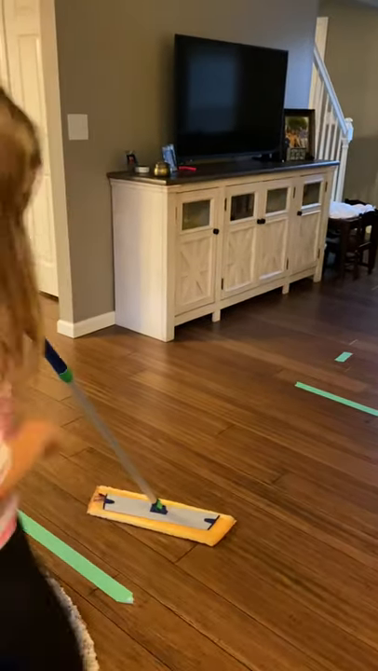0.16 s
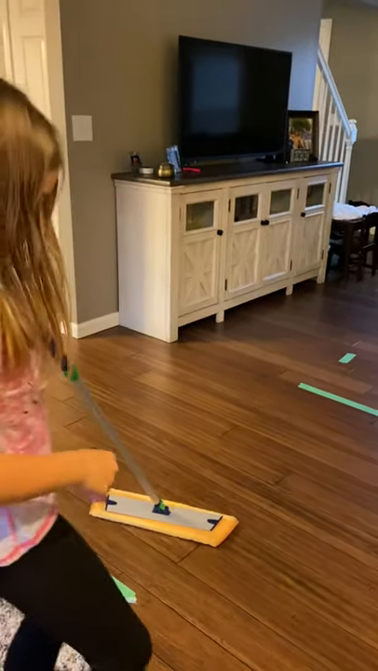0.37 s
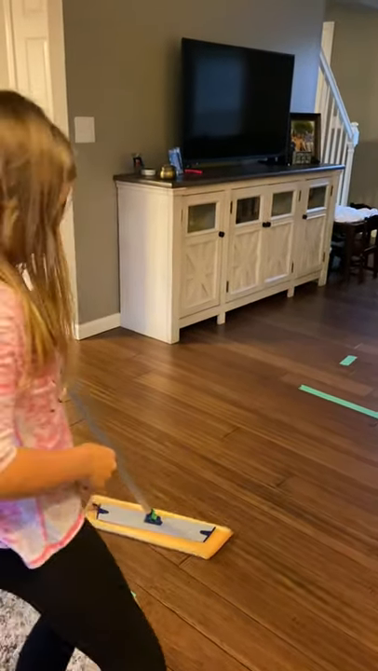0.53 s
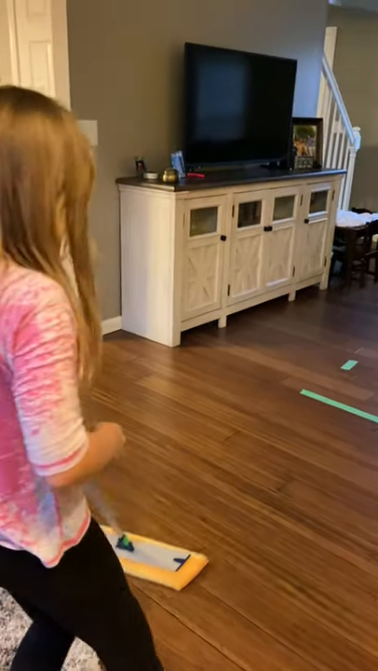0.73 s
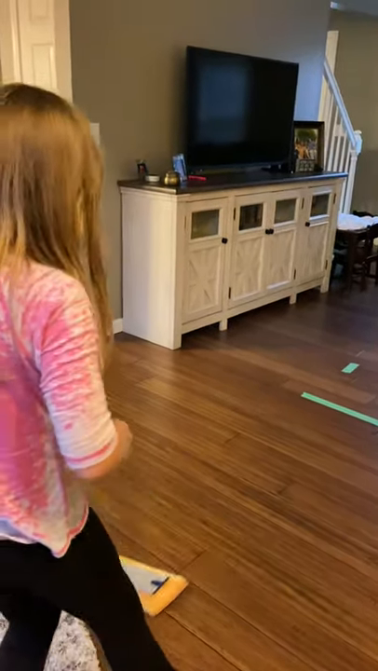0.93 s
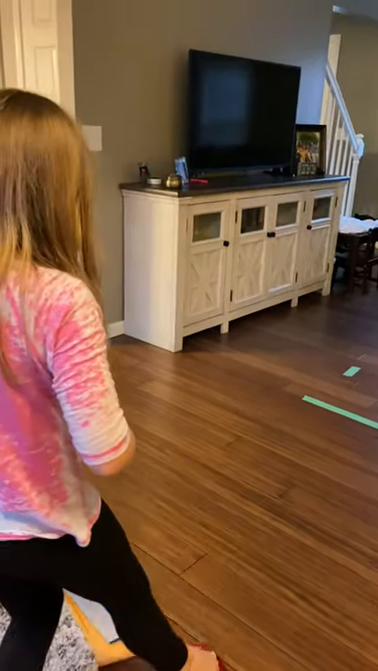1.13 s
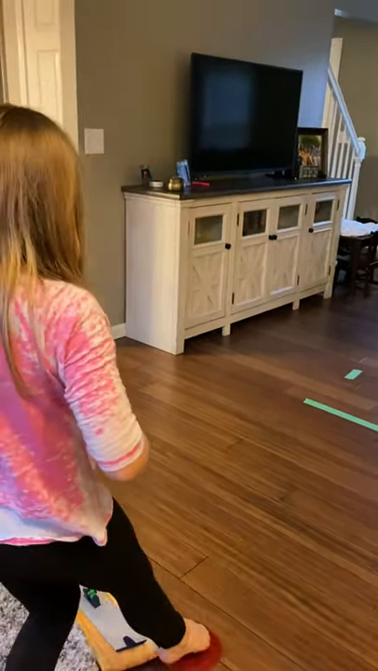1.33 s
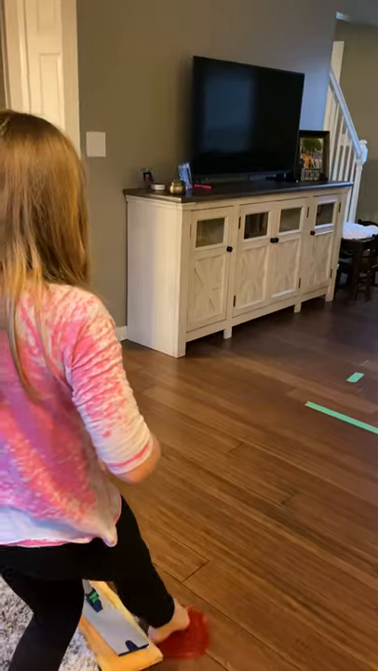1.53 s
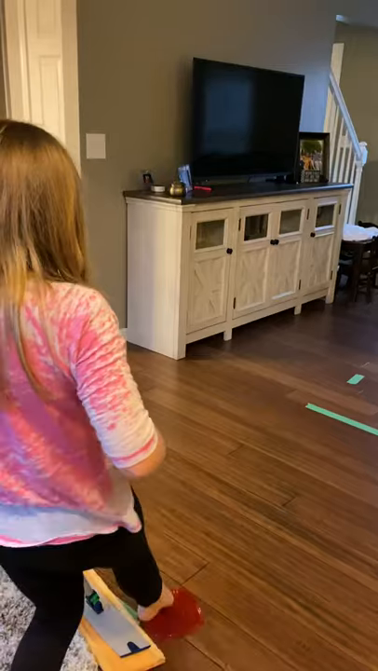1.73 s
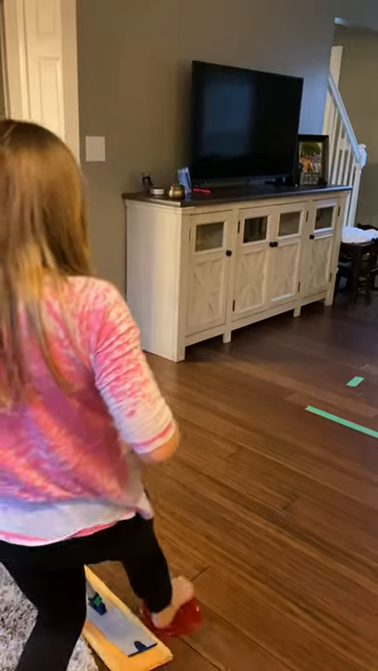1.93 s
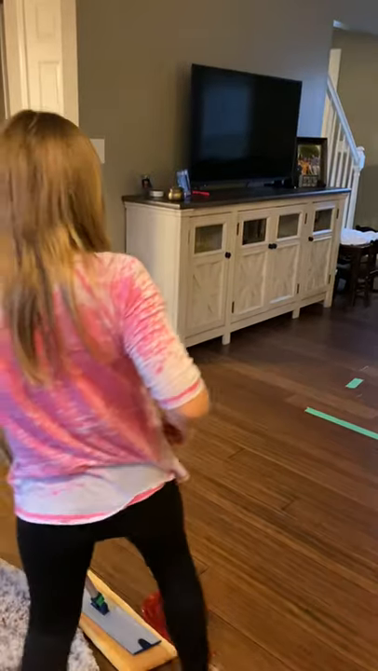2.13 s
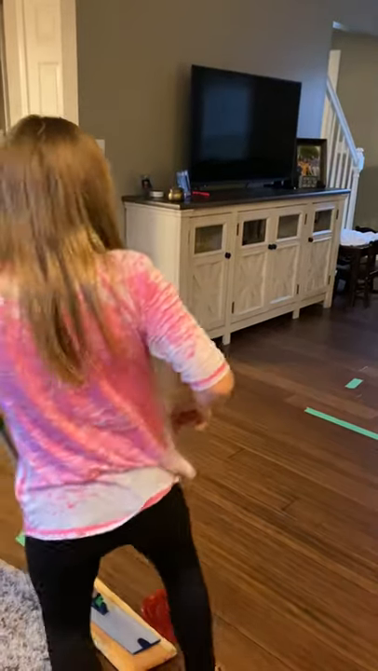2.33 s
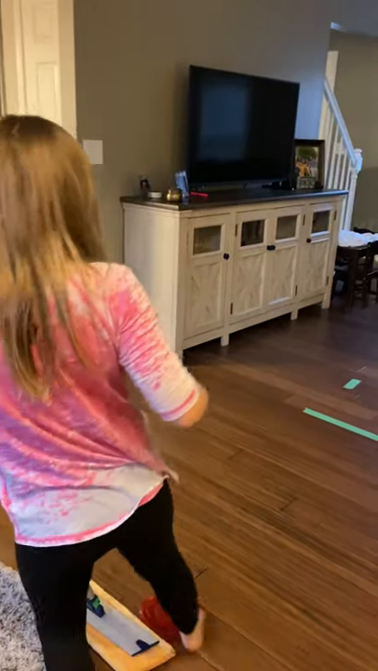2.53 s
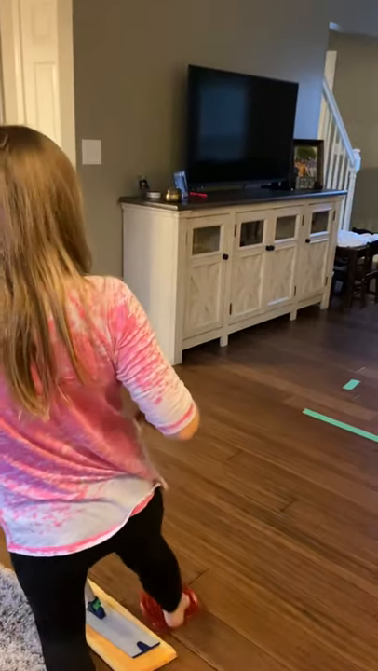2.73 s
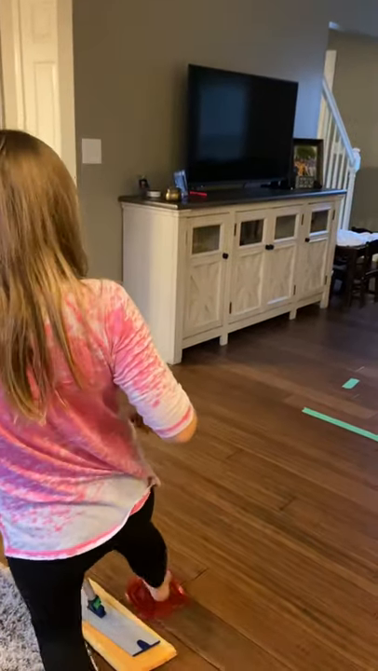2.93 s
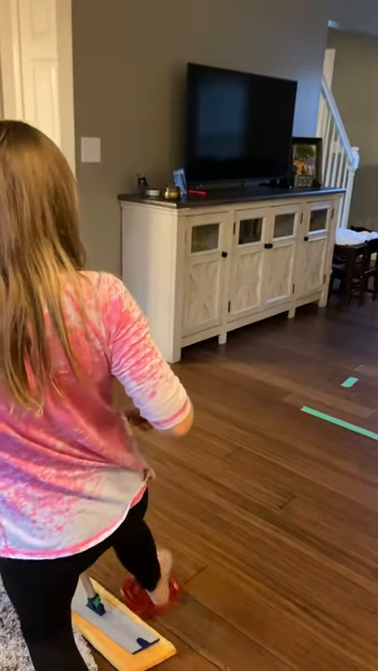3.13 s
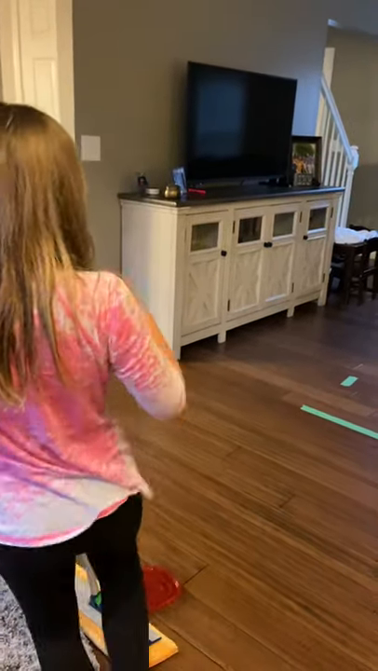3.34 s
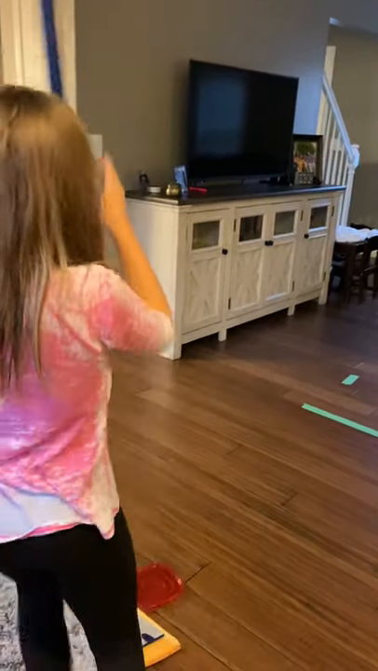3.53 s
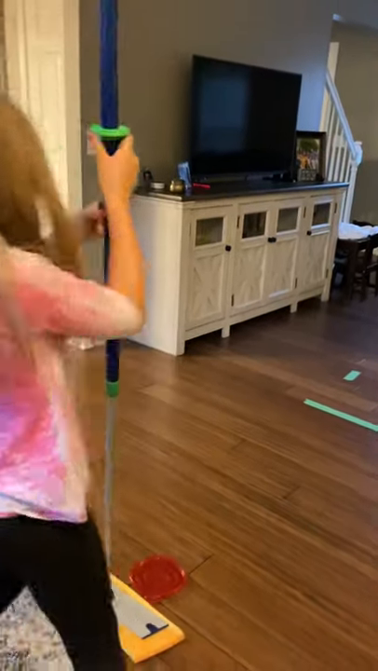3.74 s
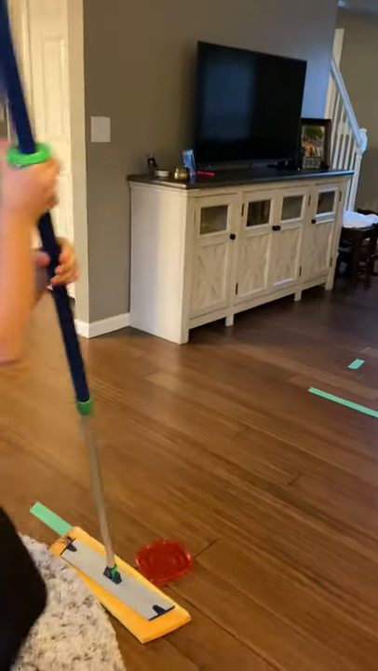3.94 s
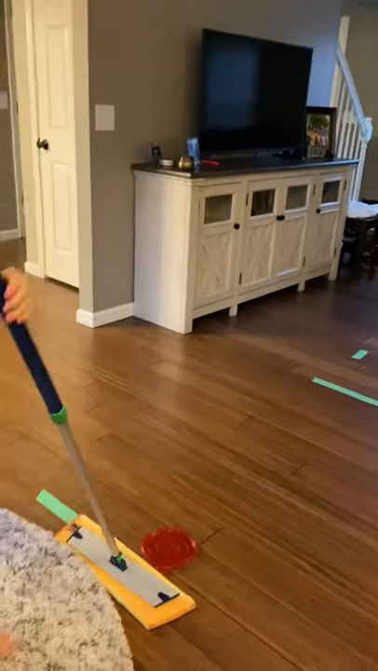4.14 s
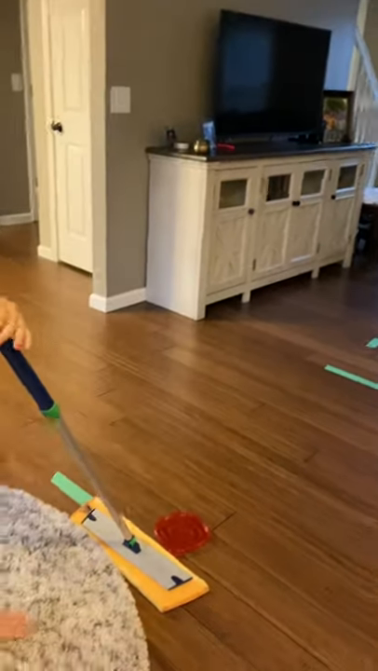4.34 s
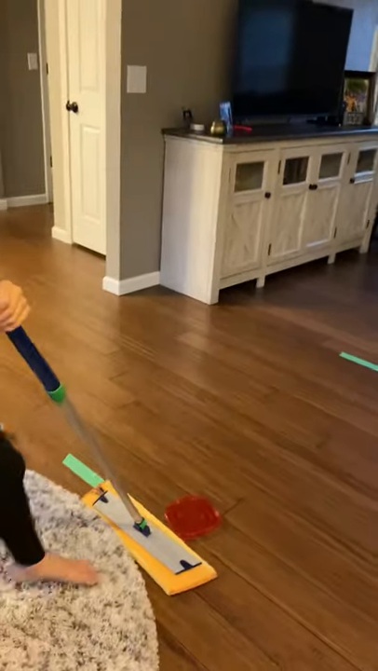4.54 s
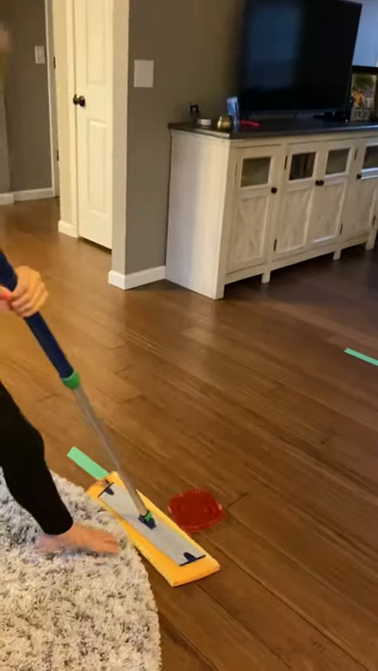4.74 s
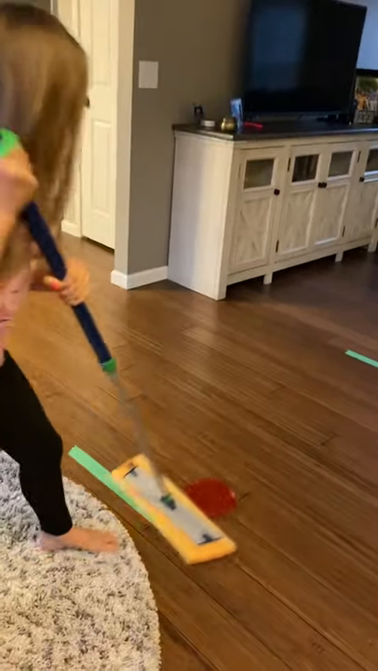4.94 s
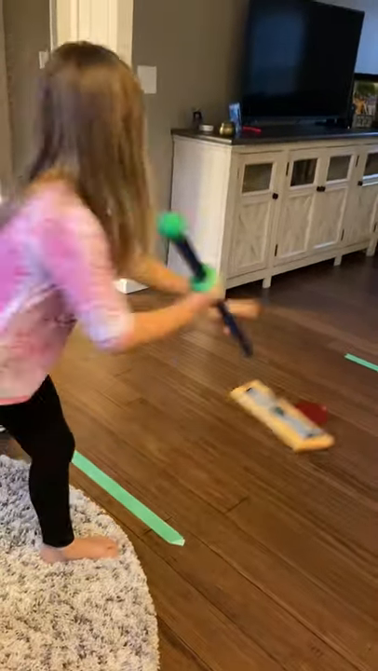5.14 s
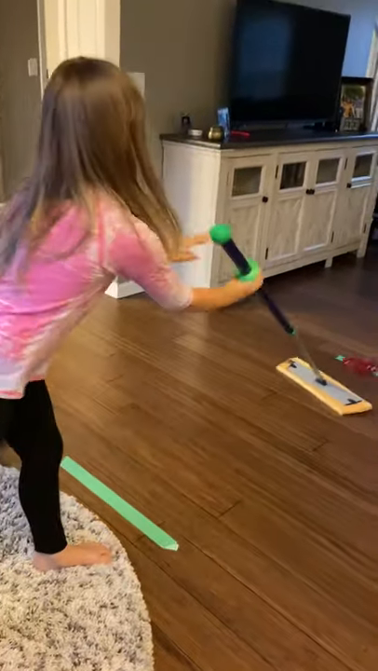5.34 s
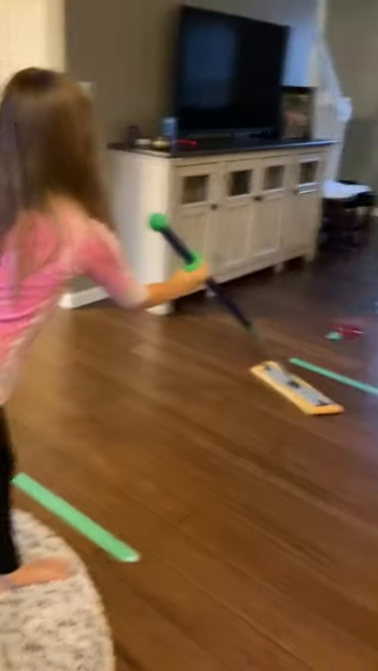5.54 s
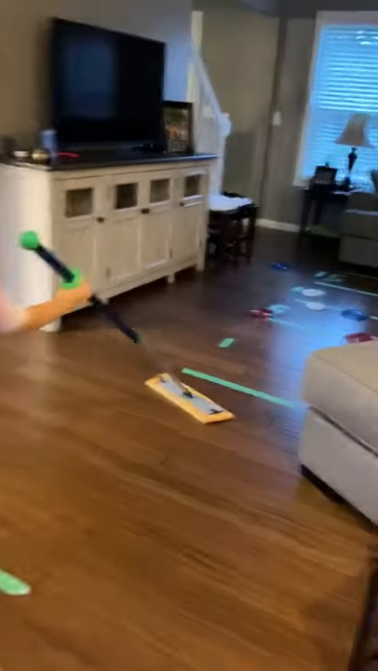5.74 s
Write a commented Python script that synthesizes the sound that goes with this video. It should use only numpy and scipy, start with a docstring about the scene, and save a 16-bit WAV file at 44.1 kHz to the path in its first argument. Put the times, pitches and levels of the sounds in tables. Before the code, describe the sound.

Over a low indoor hum, a mop knocks a plastic lid across floorboards; quiet shuffling and thuds lead to a loud, rattling scrape.

```python
"""A machine's low hum is heard first, with the air of the room and light rubs and taps on a hardwood floor.
A flat mop knocks a plastic lid over the boards; a bare foot nudges it back, and the mop shoves it off.
Stick-slip over grit scrapes and rings the lid, impulses knock it, and noise makes rubs, taps and short rings.
Damped sinusoids with noise make the footfalls, and harmonics of one turning rate make the hum."""
import sys
import numpy as np
from scipy import signal
from scipy.fft import rfft, irfft
from scipy.io import wavfile

SR = 44100
rng = np.random.default_rng(int(sys.argv[2]) if len(sys.argv) > 2 else 0)


def materialize(psi):
    """Save the field psi as 16-bit PCM at rate SR to the path in sys.argv[1].

    A 1-D psi becomes a single channel; in a 2-D psi each row is a channel.
    """
    bounded = np.clip(np.atleast_2d(psi).T, -1, 1)
    quanta = np.round(bounded * 32767).astype(np.int16)
    wavfile.write(sys.argv[1], SR, quanta)


N = 254898

# Harmonics of the machine: multiple of the turning rate, early level/dB, level once it labours/dB
HUM_HARMONICS = [(4, -47, -48), (5, -75, -56), (6, -63.5, -88), (7, -74.5, -63.5), (8, -84, -58.5),
                 (10, -58, -56.5), (11, -68, -56), (12, -61, -66), (18, -80, -72.5)]
TURN_HZ, LABOURS_AT_S = 14.245, 3.5
# Spectrum of the room's air: f/Hz, relative level/dB
AIR_SPECTRUM = [(20, -16), (45, 1.5), (90, 1), (150, 3), (200, -8), (300, -9.5), (450, -22.5), (800, -32.5),
                (2000, -36.5), (5000, -48), (10000, -56), (16000, -53)]
AIR_DB = -53

# Light sweeps of pad and bare soles: t of the fastest moment/s, rise/s, fade/s,
# pad level/dB, scrape level/dB, hiss level/dB (levels before the shared trims)
SWEEPS = [(.04, 0.91, 0.15, -57, -80, -85.5), (.17, 0.13, 0.093, -74, -71, -91),
          (1.87, 0.047, 0.21, -64.5, -120, -81), (2.025, 0.12, 0.12, -58.5, -68, -102),
          (2.19, 0.26, 0.34, -58.5, -67, -77.5), (2.379, 0.17, 0.052, -69, -71, -94),
          (3.3, .02, 0.19, -74, -91, -107), (3.45, 0.092, 0.52, -65, -70.5, -79.5),
          (3.63, 0.12, 0.18, -72, -71, -89), (4.11, 0.068, 0.27, -68.5, -69, -81),
          (4.221, 0.14, 0.2, -73.5, -73.5, -98), (4.81, 0.18, 0.088, -58, -63, -88),
          (4.847, 0.035, 0.059, -54, -47, -67)]
SWEEP_DEPTH_DB, SWEEP_RING_DB = 27.5, -18  # drop over one rise or fade time; rim ring against scrape

# Scuffs, light taps and short noisy rings of the struck lid:
# t/s, level/dB, centre f/Hz, 60 dB decay/s, band edge over centre
NOISE_BURSTS = [(.035, -39, 1050, .04, 1.25), (.037, -43, 600, .05, 2), (.402, -52, 420, .05, 1.6),
                (.731, -23, 1130, .11, 1.1), (.7315, -29, 480, .08, 1.35), (.776, -32, 480, .25, 1.7),
                (1.185, -28.5, 2700, .13, 1.35), (1.185, -26, 1870, .17, 1.06), (1.186, -38, 480, .14, 1.9),
                (1.464, -37, 540, .04, 2), (1.524, -40, 1300, .08, 2), (1.867, -48, 600, .06, 1.7),
                (2.156, -41, 1000, .04, 1.6), (2.162, -38, 590, .06, 1.3), (2.366, -50, 900, .09, 2.2),
                (2.668, -33, 2600, .1, 1.55), (2.692, -30, 2600, .09, 1.55), (2.927, -35, 2200, .1, 1.55),
                (2.935, -46, 560, .4, 1.7), (3.123, -50, 980, .07, 1.3), (3.141, -49, 980, .05, 1.3),
                (3.232, -54, 1300, .06, 1.3), (3.469, -51, 3200, .07, 1.7), (3.62, -51, 2400, .06, 1.6),
                (3.643, -51, 2500, .04, 1.5), (3.685, -50, 1700, .04, 1.5), (3.832, -57, 2400, .06, 1.8),
                (3.913, -57, 2400, .06, 1.7), (4.094, -55, 2750, .06, 1.6)]
# Footfalls: t/s, level/dB, floor f/Hz, 60 dB decay/s
FOOTFALLS = [(0.135, -43, 46.7, 0.13), (0.94, -39, 140, 0.18), (2.175, -41, 140, 0.32),
             (2.226, -41, 52, 0.45), (2.262, -43, 150, 0.22), (3.436, -41, 104, 0.38),
             (3.472, -33, 125, 0.2), (3.485, -33, 68.2, 0.45), (3.518, -31, 54.7, 0.28),
             (3.598, -38, 94, 0.22)]
THUD_SPREAD, LANDING_S = 1.7, .008  # band edge over centre; time constant of the onset

# Three slides of the lid, each as a curve: t/s, scrape level/dB, grit level/dB (before the shared trims)
STRUCK = [(.594, -40, -62), (.66, -42.5, -55), (.724, -42, -54), (.742, -34.5, -52), (.87, -41.5, -64),
          (1.01, -48.5, -69.5), (1.13, -45, -82), (1.23, -44, -82), (1.31, -50, -75), (1.43, -50.5, -82),
          (1.74, -52, -73), (1.95, -86, -112)]
NUDGED = [(2.47, -88, -100), (2.545, -76, -90), (2.57, -60, -87), (2.612, -64, -96), (2.7, -44.5, -100),
          (2.81, -61, -81.5), (2.855, -57, -75), (2.905, -63, -81), (2.938, -55, -81), (3.1, -79, -110)]
SHOVED = [(4.871, -48.5, -82), (4.93, -42, -54), (5.09, -47, -57), (5.2, -35.5, -54.5), (5.33, -36, -48),
          (5.48, -35, -48.5), (5.58, -42.5, -51.5), (5.78, -43, -60)]
# Ceilings set by the pressure on each slide: curve, rim ring level/dB, pad level/dB
SLIDES = [(STRUCK, -63.5, -57.5), (NUDGED, -34, -55.5), (SHOVED, -15, -41.5)]
RING_OVER_SCRAPE_DB, PAD_OVER_SCRAPE_DB = -5, 2  # in light contact, before the shared trims
GRIP_S = 0.038  # length of the ramp into and out of a slide
# Spectra of the parts of a slide: f/Hz, relative level/dB
SCRAPE_SPECTRUM = [(300, -20), (900, -11.5), (1400, -1), (2100, 8.5), (2600, 9), (3500, 5), (4400, -1),
                   (6000, -9.5), (9000, -29), (16000, -17)]
RIM_SPECTRUM = [(900, -20), (1550, 0), (2200, 0), (3500, -14)]
GRIT_SPECTRUM = [(1500, -49), (4000, -15.5), (6500, -1), (15800, -29)]
PAD_SPECTRUM = [(100, -5), (250, 0.5), (480, 2), (750, 2), (1050, -1), (1600, -1.5), (2600, -8),
                (6000, -37.5)]

# Fixed modes of the lid: f/Hz, relative level/dB, 60 dB decay/s
LID_MODES = [(474, -7, 0.02), (1130, -1, 0.04), (2390, -1, 0.025), (2983, -4, .03), (3450, -6.5, 0.039),
             (3750, -5.5, 0.025), (4620, -13.5, 0.075), (6600, -3, .015)]
# The rim's main mode shifts as mop or foot bears on the lid: t/s, f/Hz, rms wobble/Hz
RIM_PITCH = [(.6, 1780, 10), (.71, 1780, 15), (.74, 1870, 45), (1.8, 1820, 55), (2.61, 1800, 40),
             (2.7, 2050, 170), (2.8, 1980, 110), (2.93, 1830, 75), (3.1, 1800, 30), (4.87, 1670, 110),
             (5.25, 1760, 110), (5.78, 1740, 90)]
RIM_T60_S = 0.026
RIM_DB, SLIP_RIM_DB = 7, -1  # gain of the main mode among the lid's modes: in knocks, in slides

# Plastic knocks and ticks: t/s, level/dB before the click and ring gains, centre f/Hz, ring over click/dB
KNOCKS = [(0.595, -32, 1810, 6), (0.7292, -29, 2600, -6), (0.7319, -16.5, 1500, -2),
          (0.7385, -19, 2600, -8), (0.746, -18.5, 2600, -10), (0.7535, -21, 2200, -6),
          (0.7721, -19.5, 3380, -2), (0.7805, -23, 2400, -4), (0.793, -26, 1900, -2),
          (1.1842, -21.5, 2500, -2), (1.191, -27, 2600, -1), (2.157, -44, 3200, -2),
          (2.3671, -42, 4000, -6), (2.699, -31, 3000, -4), (2.937, -35, 2400, -1), (3.291, -48, 4000, -14),
          (3.326, -50, 1820, -2), (3.544, -40, 2030, -5), (4.8604, -24, 2300, -11), (4.8745, -31, 2400, -6),
          (4.973, -28, 2800, -7), (5.0188, -28, 2600, -4), (5.0585, -32, 2800, 0), (5.0905, -28, 2800, -1),
          (5.117, -27, 3000, -5), (5.1345, -19, 2700, -5), (5.141, -26, 2800, 0), (5.1698, -25, 3600, -6),
          (5.2042, -17, 2700, -5), (5.2365, -28, 6500, -5), (5.247, -23, 3000, -1), (5.288, -27, 6500, -3),
          (5.32, -22, 6500, -4), (5.326, -14.5, 5200, -1), (5.3637, -24, 8000, -5), (5.4316, -27, 7500, -6),
          (5.4457, -16, 4000, -3), (5.4501, -17.5, 2600, -5), (5.457, -22, 2800, -3),
          (5.4905, -22, 9000, 0)]
CLICK_DB, RING_DB = 1.5, -2
CLICK_SPREAD, CHATTER_S = 1.85, .0007  # band edge over centre; time constant of the chatter

# Spectra of the shove's fizz and crackle: f/Hz, relative level/dB
FIZZ_SPECTRUM = [(5500, -20), (6800, -37), (11000, 14), (15500, 5.5)]
CRACKLE_SPECTRUM = [(500, 26.5), (1700, 6), (3500, 13.5), (5000, 6.5), (7000, 6), (15500, -68)]
# Scratches of grit under the shoved rim: centre f/Hz
SCRATCH_HZ = [1800, 2580, 3800, 4870, 6850]
FIZZ_PER_S, FIZZ_SPREAD_DB = 3500, 4
CRACKLE_DB = -44.5
SHOVE_EASES_AT_S, EASED_DB = 4.87, -13  # the crackle falls steadily to this relative level

# Places of the lid, beside the feet, ahead, then off to the right: start t/s, lead of the right channel/s
PLACES = [(0, .0002), (4.858, 0), (5.15, .00026)]
# Until the shove a body stands in the way: a lower direct-to-echo ratio, and a lean to the left
SHADED_UNTIL_S, SHADE_DB, SHADE_LEAN_DB = 4.858, -10, 0.5
# Reverberation of the room: f/Hz, 60 dB decay/s
ROOM_T60 = [(150, 1), (600, 0.53), (2500, 0.14), (6000, 0.35), (14000, 0.32)]
# Spectrum of the echoes: f/Hz, relative level/dB
ECHO_SPECTRUM = [(300, -5.5), (2000, -1.5), (5000, -3.5), (12000, 0)]
KNOCK_WET_DB, CRUNCH_WET_DB = -7.5, -7  # echo gains, before the shading
EDGE_HZ = 15900


def amp(db):
    """Decibel law: level to amplitude gain."""
    return 10 ** (np.asarray(db) / 20)


def unit(x):
    """Normalisation to a root-mean-square value of 1."""
    return x / np.sqrt(np.mean(x ** 2) + 1e-20)


def read(points, hz):
    """Linear interpolation of (f/Hz, value) points along a logarithmic frequency axis."""
    f, value = np.transpose(points)
    return np.interp(np.log(hz + 1), np.log(f), value)


def colour(x, points):
    """Spectral shaping: weights each Fourier component, then normalises to rms 1."""
    gain = amp(read(points, np.fft.rfftfreq(N, 1 / SR)))
    return unit(irfft(rfft(x) * gain, N))


def add(mix, s, sound):
    """Superposition: sums a sound into the mix from s seconds."""
    part = mix[max(round(s * SR), 0):][:len(sound)]
    part += sound[:len(part)]


def band(x, hz, spread):
    """Band-pass filtering from hz / spread to hz * spread, scaled to peak 1."""
    spread = max(spread, 1.05)
    edges = [hz / spread, min(hz * spread, SR / 2 - 500)]
    y = signal.sosfilt(signal.butter(2, edges, "band", fs=SR, output="sos"), x)
    return y / abs(y).max()


def drift(per_s):
    """Random modulation: low-passed noise of rms 1, weakening above half of per_s."""
    return colour(rng.standard_normal(N), [(per_s / 2, 0), (per_s * 2, -40), (per_s * 10, -120)])


def diffuse(pair):
    """Diffuse-field coherence: the two channels are mostly alike in the bass and differ above it."""
    hz = np.fft.rfftfreq(pair.shape[1], 1 / SR)
    same = np.clip(read([(130, 0.83), (260, 0.83), (520, 0.041), (9000, 0.16)], hz), 0, 1)
    mid, side = rfft(pair) * np.sqrt([1 + same, 1 - same])
    return irfft(np.array([mid + side, mid - side]) / 2, pair.shape[1])


def hum(change_s=0.038):
    """Harmonic radiation: multiples of one turning rate shift in level as the machine labours."""
    t, out = np.arange(N) / SR, np.zeros((2, N))
    labour = np.clip((t - LABOURS_AT_S) / change_s + .5, 0, 1)
    for k, early_db, late_db in HUM_HARMONICS:
        hz = k * TURN_HZ
        waver_db = .07 * k * drift(per_s=2)
        db = early_db + labour * (late_db - early_db) + waver_db
        lean_db = read([(60, 5.0), (120, -0.5)], hz)  # the deepest tones are stronger on the left
        gain = amp(db + np.array([[.5], [-.5]]) * lean_db)
        out += gain * np.sqrt(2) * np.sin(2 * np.pi * (hz * t + rng.random()))
    return out


def room_air():
    """Diffuse noise: shaped random sound with partial coherence between the channels."""
    return amp(AIR_DB) * colour(diffuse(rng.standard_normal((2, N))), AIR_SPECTRUM)


def sweep_levels():
    """Exponential envelopes: the four gains of a light sweep swell to its fastest moment and die away."""
    t, level = np.arange(N) / SR, np.zeros((4, N))
    for s, rise_s, fade_s, pad_db, scrape_db, hiss_db in SWEEPS:
        swell = amp(-SWEEP_DEPTH_DB * np.maximum((s - t) / rise_s, (t - s) / fade_s))
        level += np.outer(amp([scrape_db, scrape_db + SWEEP_RING_DB, hiss_db, pad_db]), swell)
    return level


def slide_levels():
    """Saturating friction: rim ring and pad rub grow with the scrape up to ceilings set by pressure."""
    t, level = np.arange(N) / SR, np.zeros((4, N))
    for curve, ring_top_db, pad_top_db in SLIDES:
        s, scrape_db, grit_db = np.transpose(curve)
        moving = np.clip(1 + np.minimum(t - s[0], s[-1] - t) / GRIP_S, 0, 1) ** 3
        scrape = amp(np.interp(t, s, scrape_db))
        grit = amp(np.interp(t, s, grit_db))
        # the hypot of reciprocals bends each gain over smoothly at its ceiling
        ring = 1 / np.hypot(1 / (scrape * amp(RING_OVER_SCRAPE_DB)), 1 / amp(ring_top_db))
        pad = 1 / np.hypot(1 / (scrape * amp(PAD_OVER_SCRAPE_DB)), 1 / amp(pad_top_db))
        level += moving * np.array([scrape, ring, grit, pad])
    return level


def grains(per_s, spread_db):
    """Stick-slip as a random pulse train: tiny slips of random size and sign, at rms 1."""
    size = amp(spread_db * np.minimum(rng.exponential(1, N), 4))
    happens = rng.random(N) < per_s / SR
    return unit(size * rng.choice([-1, 1], N) * happens)


def rim_mode(x, wobble_per_s=90):
    """Time-varying resonance: a damped mode of the rim follows its wobbling pitch."""
    t = np.arange(N) / SR
    s, pitch, wobble = np.transpose(RIM_PITCH)
    hz = np.interp(t, s, pitch) + np.interp(t, s, wobble) * drift(wobble_per_s)
    turn = np.exp(2j * np.pi * np.cumsum(hz) / SR)
    decay = amp(-60 / (RIM_T60_S * SR))
    # damp in the frame that turns with the pitch, then turn back
    return (turn * signal.lfilter([1], [1, -decay], x / turn + 1e-18)).imag


def lid_ring(x, main_db):
    """Modal superposition: a force on the rim excites the fixed modes and the shifting main mode."""
    t = np.arange(SR // 4) / SR
    ring = sum(amp(db - 60 * t / t60) * np.sin(2 * np.pi * hz * t) for hz, db, t60 in LID_MODES)
    fixed_modes = signal.oaconvolve(x, ring)[:N]
    return (fixed_modes + amp(main_db) * rim_mode(x)) / np.linalg.norm(ring)


def slides(judder_db=3.0, rustle_db=1.5, modes_db=-10):
    """Stick-slip friction: slips scrape and ring the lid, grit hisses and the pad rubs, under one judder."""
    level = slide_levels() + sweep_levels() * amp(rustle_db * drift(per_s=16))
    slips = grains(per_s=3000, spread_db=2.5)
    modes = lid_ring(grains(per_s=3700, spread_db=-1.5), main_db=SLIP_RIM_DB)
    scrape = colour(slips + amp(modes_db) * modes, SCRAPE_SPECTRUM)
    rim = colour(rim_mode(rng.standard_normal(N)), RIM_SPECTRUM)
    grit = colour(slips + rng.standard_normal(N), GRIT_SPECTRUM)
    pad = colour(grains(per_s=3900, spread_db=3.5), PAD_SPECTRUM)
    parts = np.array([scrape, rim, grit, amp(-3.0) * pad])
    return (level * parts).sum(0) * amp(judder_db * drift(per_s=122))


def noise_bursts(rise_share=0.009):
    """Damped noise for rubs, taps and the lid's brief ringing; longer bursts start more softly."""
    out, t = np.zeros(N), np.arange(SR // 4) / SR
    for s, db, hz, t60, spread in NOISE_BURSTS:
        onset = 1 - np.exp(-t / (rise_share * t60))
        shape = onset * np.exp(-np.log(1000) * t / t60)
        add(out, s, amp(db) * band(rng.standard_normal(len(t)) * shape, hz, spread))
    return out


def steps(swing=0.89):
    """Damped oscillation: a soft heel makes a dull, round thud and swings the floor a little."""
    out, t = np.zeros(N), np.arange(SR // 2) / SR
    landing = 1 - np.exp(-t / LANDING_S)
    for s, db, hz, t60 in FOOTFALLS:
        rumble = band(band(rng.standard_normal(len(t)), hz, THUD_SPREAD), hz, THUD_SPREAD)
        floor = swing * np.sin(2 * np.pi * hz * t)
        add(out, s, amp(db - 60 * t / t60) * landing * (floor + unit(rumble)))
    return out


def knocks(chatter=0.23):
    """Impulse excitation: each blow clicks with a brief chatter of the rim, and the lid's modes ring on."""
    clicks, into_lid = np.zeros((2, N))
    t = np.arange(1024) / SR
    for s, db, hz, ring_db in KNOCKS:
        blow = signal.unit_impulse(len(t))
        rattle = chatter * rng.standard_normal(len(t)) * np.exp(-t / CHATTER_S)
        add(clicks, s, amp(db) * band(blow + rattle, hz, CLICK_SPREAD))
        add(into_lid, s, amp(db + ring_db) * band(blow, hz, spread=2.4))
    return amp(CLICK_DB) * clicks + amp(RING_DB) * lid_ring(into_lid, RIM_DB)


def crunch(fizz_db=-50, scratch_s=0.00092):
    """Abrasive contact: the hard shove presses rim into grit, with fizz and tiny scratches in several bands."""
    t = np.arange(N) / SR
    s, _, grit_db = np.transpose(SHOVED)
    pressed = np.interp(t, s, amp(grit_db - grit_db.max()), left=0)
    fizz = colour(grains(FIZZ_PER_S, FIZZ_SPREAD_DB), FIZZ_SPECTRUM) * amp(3 * drift(per_s=40))
    scratches = np.zeros(N)
    decay = np.exp(-1 / (scratch_s * SR))
    for hz in SCRATCH_HZ:
        catches = signal.lfilter([1], [1, -decay], abs(grains(per_s=140, spread_db=2.4)))
        scratch = band(catches * rng.standard_normal(N), hz, spread=1.64)
        scratches += unit(scratch) * np.sqrt(hz)
    force = np.interp(t, [s[0], SHOVE_EASES_AT_S, s[-1]], amp([0, 0, EASED_DB]), left=0)
    crackle = colour(scratches, CRACKLE_SPECTRUM)
    return amp(fizz_db) * pressed * fizz + amp(CRACKLE_DB) * force * crackle


def direct(x, bounce_db=-8, bounce_s=0.0039, bounce_lag_s=0.00044):
    """Interaural delay: a direct path from each place, and a dull near reflection from the left."""
    out = np.zeros((2, N))
    place = np.searchsorted([s for s, _ in PLACES], np.arange(N) / SR, "right") - 1
    for k, (_, lead_s) in enumerate(PLACES):
        add(out[0], lead_s, x * (place == k))
    add(out[1], 0, x)
    dull = amp(bounce_db) * signal.sosfilt(signal.butter(1, 3500, fs=SR, output="sos"), x)
    add(out[0], bounce_s, dull)
    add(out[1], bounce_s + bounce_lag_s, dull)
    return out


def tail(x, build_s=0.0013):
    """Reverberation: sparse random echoes, each frequency band dying at its own rate."""
    taps = diffuse(rng.standard_normal((2, SR // 2)) * (rng.random((2, SR // 2)) < 3000 / SR))
    hz, t, z = signal.stft(taps, SR, nperseg=256)
    decay_db = read(ECHO_SPECTRUM, hz)[:, None] - 60 * t / read(ROOM_T60, hz)[:, None]
    echo = signal.istft(z * amp(decay_db) * np.minimum(t / build_s, 1), SR, nperseg=256)[1]
    return signal.fftconvolve(x[None], echo / np.linalg.norm(echo[0]), axes=1)[:, :N]


def travelling(x, wet_db, turns_per_s=1.3, count=5):
    """Position-dependent response: the direct path plus echo patterns that cross-fade in rotation."""
    t = np.arange(N) / SR
    phase = turns_per_s * t - np.arange(count)[:, None] / count
    share = np.maximum(np.cos(2 * np.pi * phase), 0) ** 2
    share /= np.linalg.norm(share, axis=0)
    shaded = t < SHADED_UNTIL_S
    echoes = amp(wet_db) * sum(tail(x * part * amp(-SHADE_DB * shaded)) for part in share)
    # half the shade lowers everything, so the direct sound drops while the echoes gain
    shade_db = SHADE_DB / 2 + SHADE_LEAN_DB * np.array([[.5], [-.5]])
    return (direct(x) + echoes) * amp(shaded * shade_db)


def scene():
    """Superposition of hum, air and footfalls with the floor sounds heard in the room."""
    on_floor = amp(-9.0) * travelling(slides(), wet_db=6)
    on_floor += travelling(noise_bursts(), wet_db=-14.0)
    on_floor += travelling(knocks(), wet_db=KNOCK_WET_DB)
    on_floor += travelling(crunch(), wet_db=CRUNCH_WET_DB)
    return hum() + room_air() + steps() + on_floor * amp([[.4], [-.4]])  # slightly to the left


def record(dry):
    """Band limitation: a linear-phase low-pass filter removes the highest treble."""
    low_pass = signal.firwin(511, EDGE_HZ, window=("kaiser", 9), fs=SR)
    return signal.oaconvolve(dry, low_pass[None], "same")


dry = scene()
out = record(dry)
materialize(out)
```